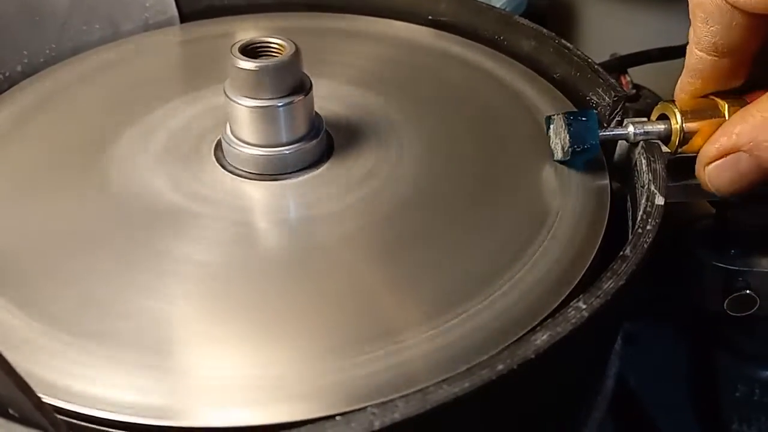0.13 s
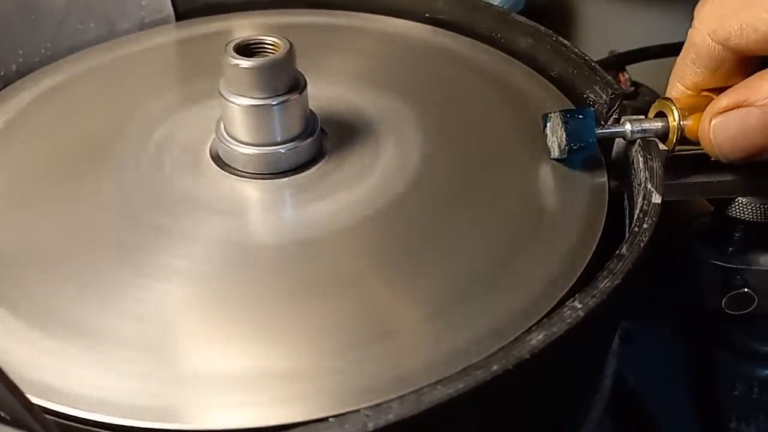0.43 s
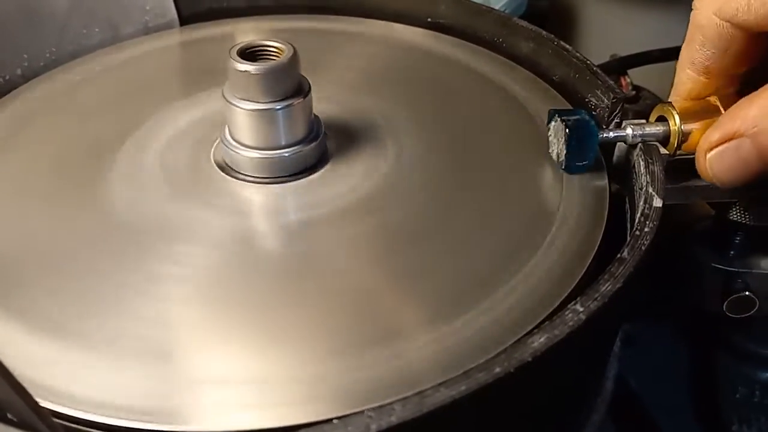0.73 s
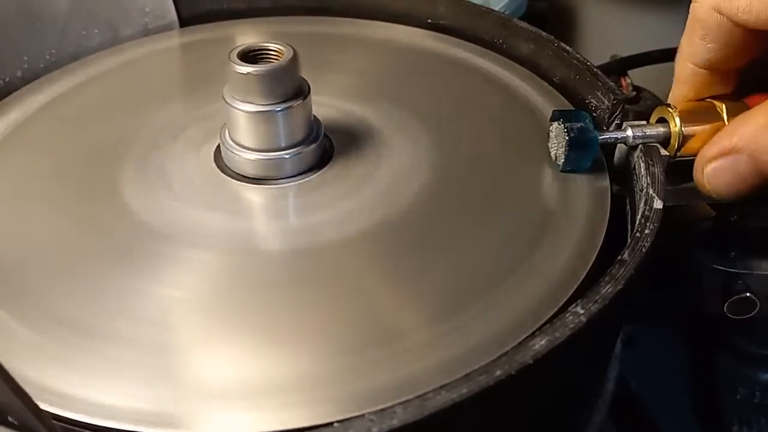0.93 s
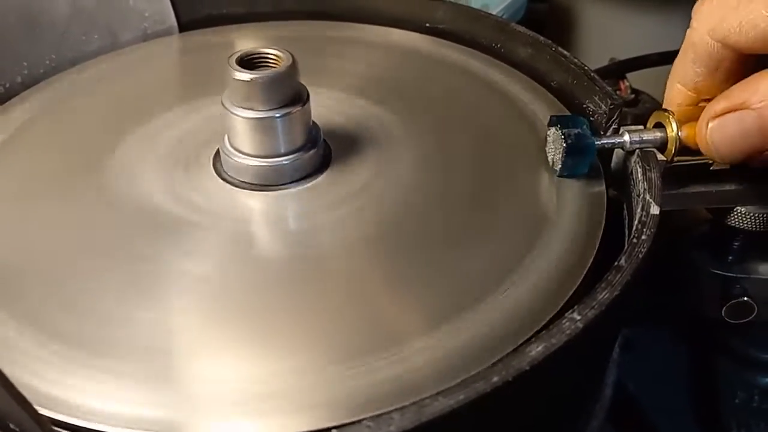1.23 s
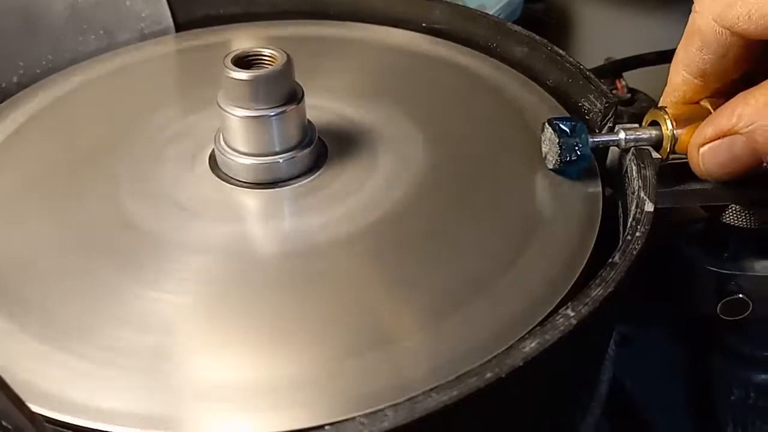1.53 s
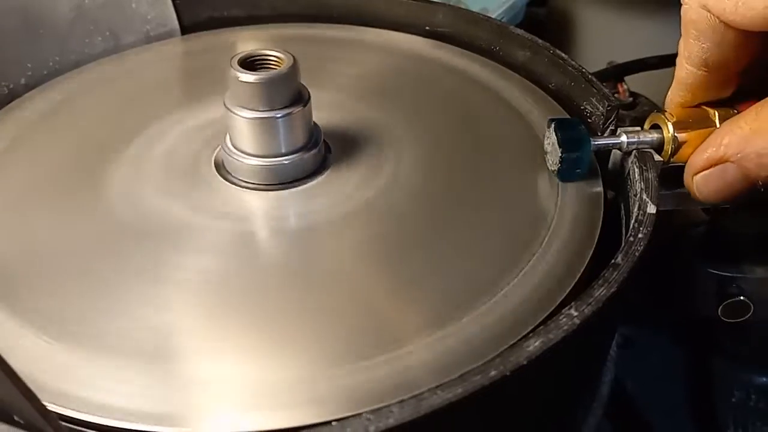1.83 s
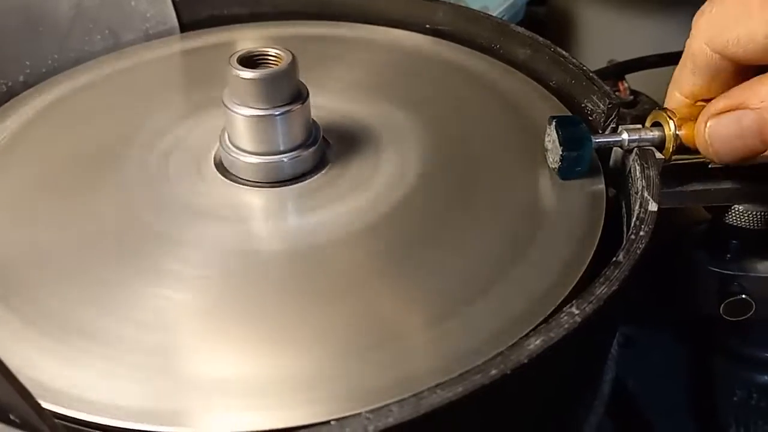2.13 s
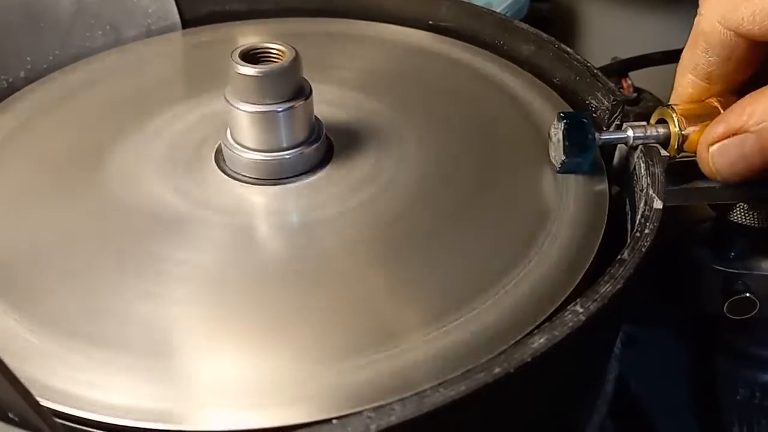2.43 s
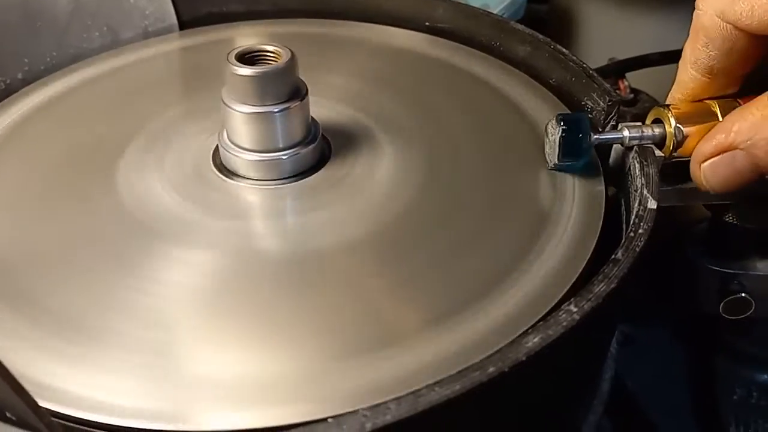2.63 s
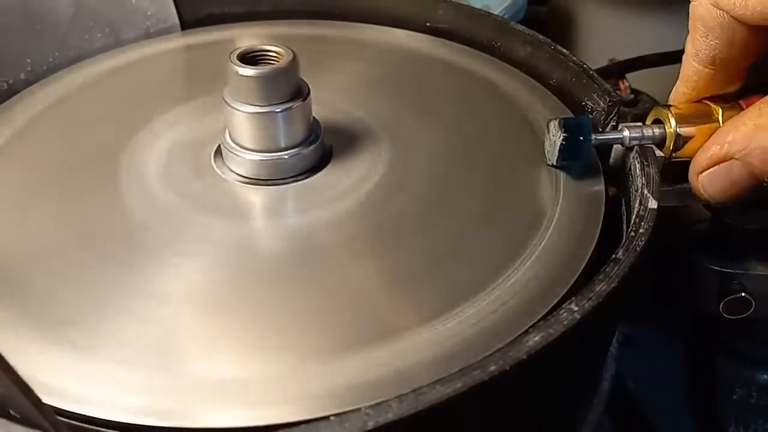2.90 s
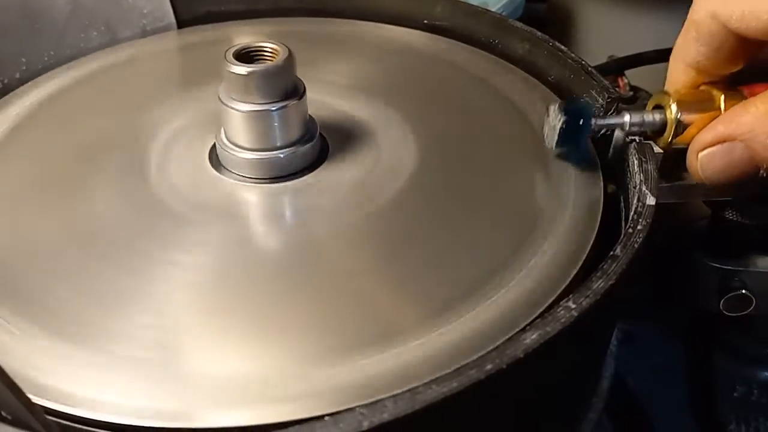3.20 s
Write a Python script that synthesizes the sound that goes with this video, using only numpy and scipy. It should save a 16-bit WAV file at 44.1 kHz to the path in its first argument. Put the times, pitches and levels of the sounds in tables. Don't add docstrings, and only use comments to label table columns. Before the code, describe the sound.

Loud, raspy grinding hiss of stone on a whirling disc, alternately sustained and chopped into tiny ticks and zips; steady motor drone and airy whirr between them, very close phone microphone, slightly overloaded, little room.

```python
import sys
import numpy as np
from scipy import signal
from scipy.fft import rfft, irfft, next_fast_len
from scipy.io import wavfile
from scipy.ndimage import uniform_filter1d, minimum_filter1d, map_coordinates

SR = 44100
rng = np.random.default_rng(int(sys.argv[2]) if len(sys.argv) > 2 else 0)


def amplitude_ratio(level_db):
    exponent = np.asarray(level_db, float) / 20
    return 10 ** exponent


def wav_record(signal):
    frames = np.transpose(np.atleast_2d(signal))
    bounded = np.clip(frames, -1, 1)
    quanta = np.round(bounded * 32767).astype(np.int16)
    wavfile.write(sys.argv[1], SR, quanta)


N = 148176


def unit(x):
    return x / np.sqrt(np.mean(x ** 2, -1, keepdims=True) + 1e-20)


def wobble(rate):
    knots = rng.standard_normal(int(N * rate / SR) + 4)
    return map_coordinates(knots, [np.arange(N) * rate / SR])


def filtered(x, response):
    m = next_fast_len(N + SR // 2)
    spectrum = rfft(x, m) * response(np.fft.rfftfreq(m, 1 / SR))
    return irfft(spectrum, m)[..., :N]


def resonance(f, centre, width):
    return 1j * f * width / (centre * centre - f * f + 1j * f * width)


def peaks(rows, f):
    return sum((-1) ** k * amplitude_ratio(db) * resonance(f, c, w) for k, (c, w, db) in enumerate(rows))


def holes(rows, f):
    return np.prod([1 - np.clip(depth, 0, 1) * resonance(f, c, w) for c, w, depth in rows], axis=0)


def ports(pair, left, right):
    return unit(filtered(pair, lambda f: np.abs([peaks(left, f), peaks(right, f)]) * [[1], [1j]]))


def air_whirr():
    # centre in Hz, width in Hz, level in dB.
    air_left = [(2600, 250, -7.5), (2970, 110, -2.5), (4100, 1600, -5.5), (5400, 430, -3.5),
                (6750, 810, -8), (7640, 490, -2), (8150, 280, 0.5), (9200, 300, -9), (11000, 1100, -12),
                (13300, 660, 0.5), (15300, 900, -9)]
    air_right = [(2480, 720, -13), (3050, 200, -3.5), (4040, 1350, -6.5), (5500, 260, 1.5),
                 (5940, 400, -5.5), (7060, 280, 3.5), (9100, 300, -13), (10800, 740, -6.5),
                 (12500, 700, -5), (13700, 500, -3), (15200, 900, -9)]
    turbulence = rng.standard_normal((2, N)) * amplitude_ratio(1 * wobble(87))
    return ports(turbulence, air_left, air_right) * amplitude_ratio([[-28], [-26.5]])


def casing_rumble(phase, motor_hz):
    # centre in Hz, width in Hz, level in dB.
    casing = [(101, 60, 0), (306, 151, 4), (794, 316, 0), (1016, 78, -1), (1230, 220, -16.5),
              (1723, 140, -7)]
    rumble_db, pulse_depth, correlation = -26, 0.4, 0.6
    a, b = rng.standard_normal((2, N)) * (1 + pulse_depth * np.cos(2 * motor_hz * phase))
    angle = np.arccos(correlation) / 2
    left = np.cos(angle) * a + np.sin(angle) * b
    right = np.cos(angle) * a - np.sin(angle) * b
    rumble = filtered(np.array([left, right]), lambda f: peaks(casing, f) / (1 + (f / 2200) ** 4))
    return amplitude_ratio(rumble_db) * unit(rumble)


def shaft_tones(phase, motor_hz):
    # multiple of the shaft rate, rms level in dB.
    orders = [(2, -32), (5, -51.5), (7, -39.5), (8, -36.5), (9, -38.5), (12, -41), (19, -58), (20, -42),
              (22, -42), (23, -51.5), (25, -47)]
    # frequency in Hz, left level in dB, right level in dB.
    whines = [(1039, -42, -41), (1735, -43, -56), (1786, -46, -58)]

    def tone(hz, shake_db):
        shake = amplitude_ratio(shake_db * wobble(14))
        return np.sqrt(2) * shake * np.sin(hz * phase + rng.uniform(0, 2 * np.pi))

    hum = sum(amplitude_ratio(db) * tone(k * motor_hz, 1.1) for k, db in orders)
    whine = sum(amplitude_ratio([[left], [right]]) * tone(hz, 1.8) for hz, left, right in whines)
    return hum + whine


def motor():
    motor_hz = 36.25
    phase = 2 * np.pi * np.cumsum(1 + 0.00399 * wobble(3)) / SR
    return shaft_tones(phase, motor_hz) + casing_rumble(phase, motor_hz) + air_whirr()


def contacts(t):
    # start in seconds, length in seconds, hiss in dB, overload rasp in dB over the hiss.
    touches = [(-.01, 0.33, -17, -11.5), (0.337, 0.014, -23, -17), (.362, 0.021, -18, -19),
               (0.401, 0.24, -19, -16), (.649, .046, -19, -13.5), (0.923, 0.0074, -18.5, -21),
               (.976, 0.018, -18.5, -6), (1.034, 0.027, -19, -10), (1.101, 0.012, -17.5, -8.5),
               (1.157, .024, -18.5, -10), (1.22, 0.016, -18.5, -11), (1.278, .025, -17, -9),
               (1.316, 0.0075, -30, -22), (1.338, 0.026, -16, -9), (1.373, 0.4786, -15, -10.5),
               (1.864, 0.01, -26, -7), (1.885, 0.023, -15, -10), (1.956, 0.0037, -14, -12.5),
               (2.012, 0.014, -19, -17), (2.136, 0.009, -18.5, -24), (2.253, .013, -24, -22),
               (2.367, 0.019, -14.5, -12), (2.405, 0.011, -10, -19), (2.42, 0.7597, -17.5, -11),
               (3.185, 0.051, -21.5, -18.5)]
    attack_s, release_s, settle_s, settle_db = 0.0007, 0.002, 0.004, 5
    glance_s, glance_db = 0.03, -3
    hiss, rasp, glance = np.zeros((3, N))
    for start, length, db, rasp_db in touches:
        since_start, since_end = t - start, t - start - length
        gate = 1 / (1 + np.exp(np.clip(-since_start / attack_s * 2, -50, 50)))
        gate = gate / (1 + np.exp(np.clip(since_end / release_s * 2, -50, 50)))
        edges = np.exp(-np.abs(since_start) / settle_s) + np.exp(-np.abs(since_end) / settle_s)
        gate = gate * amplitude_ratio(-settle_db * edges)
        hiss = hiss + amplitude_ratio(db) * gate
        rasp = rasp + amplitude_ratio(db + rasp_db) * gate
        glance = glance + amplitude_ratio(db + glance_db) * gate * np.exp(-length / glance_s)
    return hiss, rasp, glance


def overload_rasp(carrier, noise):
    # frequency in Hz, level in dB.
    rasp_colour = [(30, -57), (65, -1.5), (300, -1), (900, -3), (2500, -1), (5000, 1.5), (9000, -12),
                   (16000, -5.5)]
    f, colour = np.transpose(rasp_colour)
    rectified = 0.64 * noise - np.abs(carrier)

    def response(hz):
        return amplitude_ratio(np.interp(np.log(hz + 1), np.log(f), colour)) * (hz > 20)

    return unit(filtered(rectified, response))


def ringing(direct):
    t60_s, level_db = 0.089, -26
    tail = rng.standard_normal((2, SR // 4)) * amplitude_ratio(-60 * np.arange(SR // 4) / SR / t60_s)
    ring = signal.fftconvolve(direct, tail / np.linalg.norm(tail[0]), axes=1)[:, :N]
    return amplitude_ratio(level_db) * ring


def grinding():
    # time in seconds, pressure in dB, ripple from the disc's run-out in dB.
    hand = [(0, 4, 0.5), (.2, 3, 0.5), (.32, 0.5, 0.5), (.4, 1.5, 1), (.5, 2, 1), (.64, 4.5, 1.5),
            (1.37, 2, 0), (1.45, 2, 0.5), (1.6, 2.5, 0.5), (1.85, -1.5, 0.5), (2.4, -3.5, 2.5),
            (2.45, 4.5, 1), (2.9, 3.5, 0.38), (3.13, -0.5, 1), (3.17, 1, -0.5), (3.36, 5, 4.5)]
    # centre in Hz, width in Hz, level in dB.
    disc_left = [(2620, 520, -12), (4640, 510, -8), (6080, 220, 0.5), (7070, 850, -3.5), (8467, 754, 1.5),
                 (11340, 650, -6), (13630, 2100, -2.5), (15000, 300, -15.5)]
    disc_right = [(2300, 600, -13), (3000, 500, -16), (3900, 600, -11), (5200, 500, -8), (6050, 400, -3),
                  (7200, 900, 0), (10500, 500, -6), (12100, 1400, -9), (13600, 700, -10),
                  (14900, 1000, -16)]
    hiss_db = [1, -2.5]
    port_rasp_db = [7, -8.5]
    turn_hz, high_spot_s, second_spot = 16.55, 0.88, 0.35
    shared, glance_hz = 0.45, 9100

    t = np.arange(N) / SR
    hiss, rasp, glance = contacts(t)
    when, press, ripple = np.transpose(hand)
    turn = 2 * np.pi * turn_hz * (t - high_spot_s)
    runout = np.interp(t, when, ripple) * (np.cos(turn) + second_spot * np.cos(2 * turn + 1.8))
    force_db = 16 + np.interp(t, when, press) + 0.57 * wobble(60)

    both, own = rng.standard_normal(N), rng.standard_normal((2, N))
    grain_db = 1 * (wobble(900) + 1.23 * wobble(4000))
    grit = (shared * both + (1 - shared) * own) * amplitude_ratio(grain_db)
    carrier = ports(grit, disc_left, disc_right)
    bright = unit(filtered(carrier, lambda hz: 1 / (1 + (glance_hz / (hz + 1)) ** 8)))
    direct = amplitude_ratio(hiss_db)[:, None] * (carrier * hiss + bright * glance) * amplitude_ratio(force_db + runout)

    rough = overload_rasp(carrier, own[::-1]) * amplitude_ratio(port_rasp_db)[:, None] * rasp
    rough = rough * amplitude_ratio(4.9 * runout + 0.5 * wobble(24.94))
    return direct + ringing(direct) + rough * amplitude_ratio(force_db)


def scene():
    return grinding() + motor()


def gain_control(dry):
    duck_db, duck_from_db, knee_db, limit_db, sense_hz = 16, -15.5, 6, -12, 3000
    ahead_s, hold_s, recover_db_s, smooth_s = 0.012, 0.0035, 204, 0.0085
    sensed = filtered(dry, lambda hz: hz > sense_hz)
    level = 10 * np.log10(np.abs(uniform_filter1d(np.mean(sensed ** 2, 0), 130)) + 1e-12)
    ahead, hold = int(ahead_s * SR), int(hold_s * SR)
    limit = np.clip(limit_db - level, -duck_db, 0)
    limit = minimum_filter1d(np.pad(limit, (0, ahead), "edge"), ahead + 1)[ahead // 2:][:N]
    duck = -duck_db * np.clip((level - duck_from_db) / knee_db, 0, 1)
    duck = minimum_filter1d(np.pad(duck, (hold, 0), "edge"), hold + 1)[:N]
    climb = recover_db_s * np.arange(N) / SR
    gain_db = climb + np.minimum.accumulate(np.minimum(limit, duck) - climb)
    return amplitude_ratio(uniform_filter1d(gain_db, int(smooth_s * SR)))


def roll_off(x):
    return signal.sosfilt(signal.butter(12, 16520, fs=SR, output="sos"), x)


def record(dry):
    # centre in Hz, width in Hz, depth from 0 to 1.
    holes_left = [(523, 43, 0.25), (2172, 395, 0.14), (3450, 59, 0), (4755, 250, 0.8), (9650, 240, 0.45)]
    holes_right = [(543, 83, 1), (2236, 100, 0.48), (3700, 170, 0.69), (4490, 330, 0.34), (8500, 1270, 1)]
    ceiling, low_cut_hz, top_hz = 0.8, 52, 15750
    x = filtered(dry, lambda hz: np.abs([holes(holes_left, hz), holes(holes_right, hz)]))
    x = x * gain_control(dry)
    x = x / (1 + np.abs(x / ceiling) ** 4) ** (1 / 4)
    x = filtered(x, lambda hz: (hz < top_hz) / (1 + (low_cut_hz / (hz + 1)) ** 4))
    mix = np.clip(x, -0.9, 0.9)
    return roll_off(mix)


dry = scene()
out = record(dry)
wav_record(out)
```